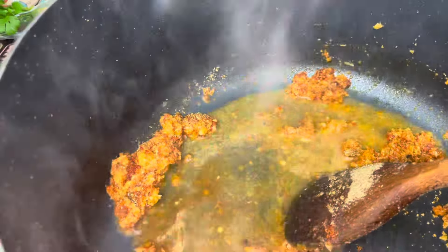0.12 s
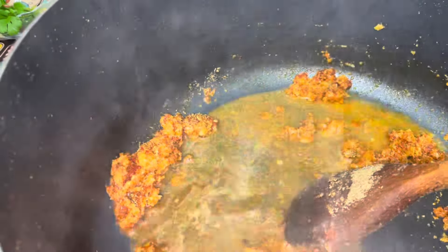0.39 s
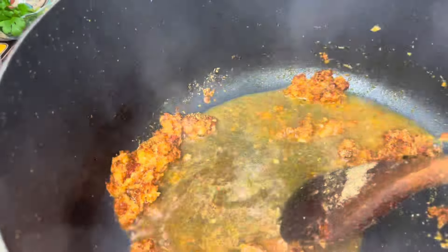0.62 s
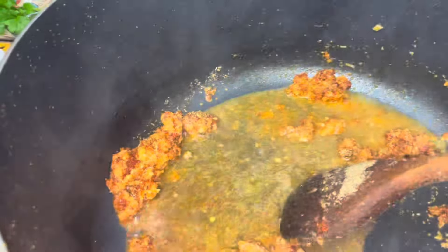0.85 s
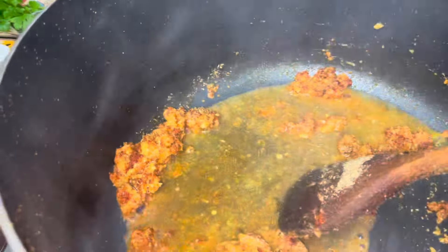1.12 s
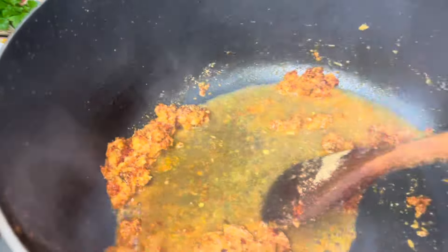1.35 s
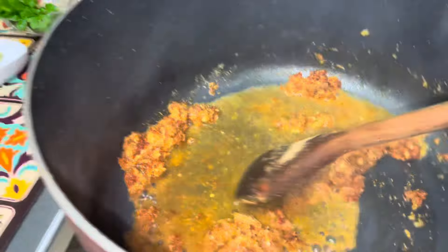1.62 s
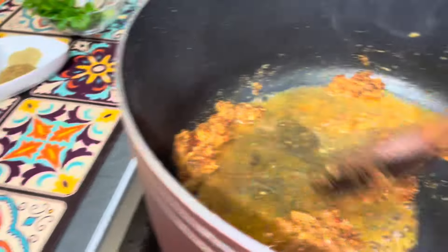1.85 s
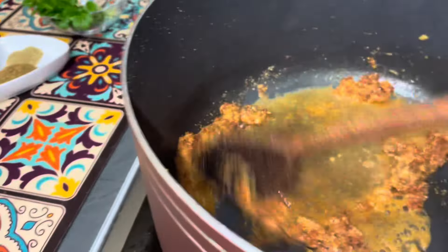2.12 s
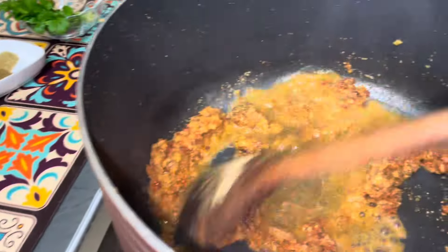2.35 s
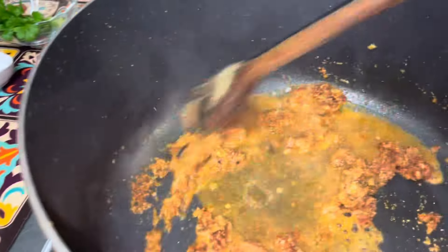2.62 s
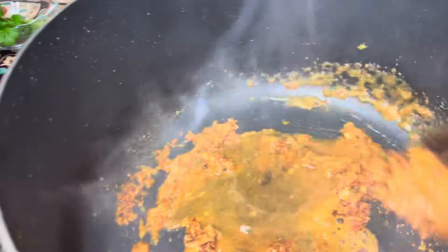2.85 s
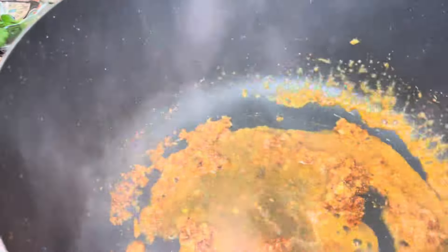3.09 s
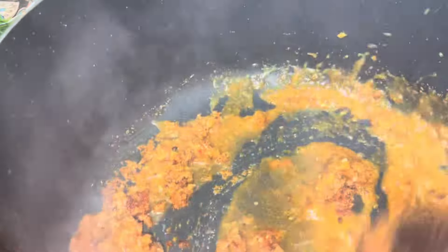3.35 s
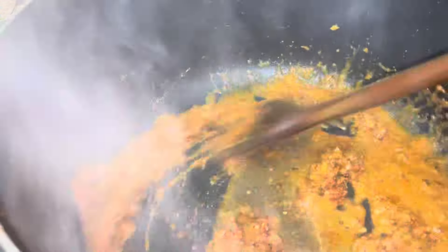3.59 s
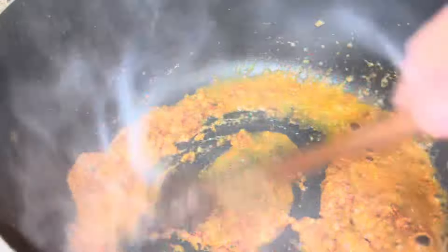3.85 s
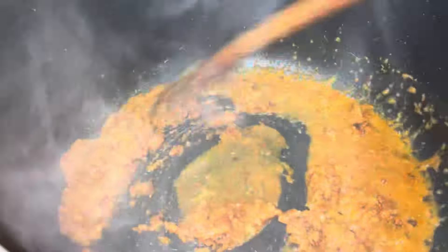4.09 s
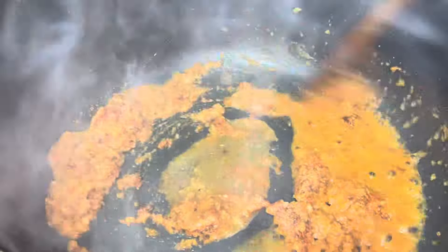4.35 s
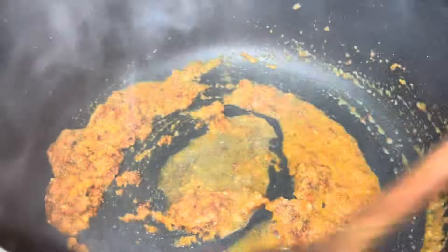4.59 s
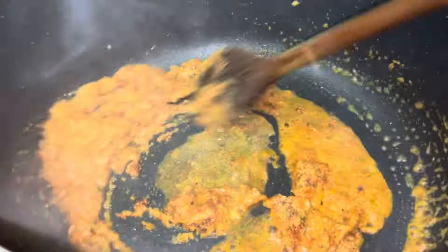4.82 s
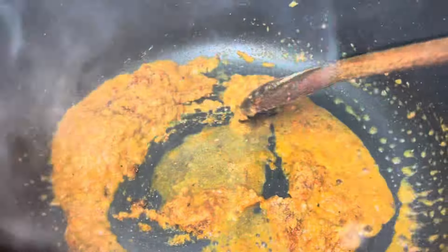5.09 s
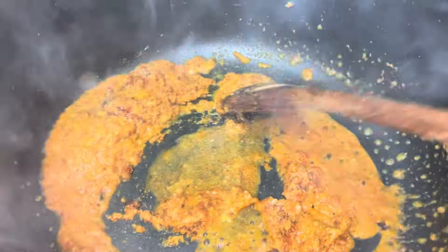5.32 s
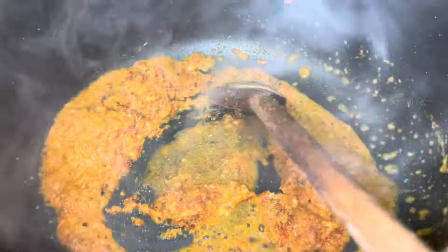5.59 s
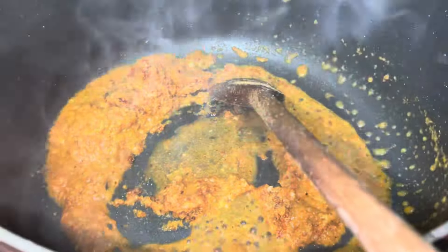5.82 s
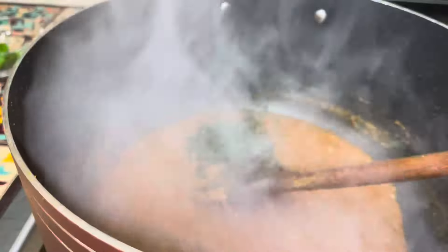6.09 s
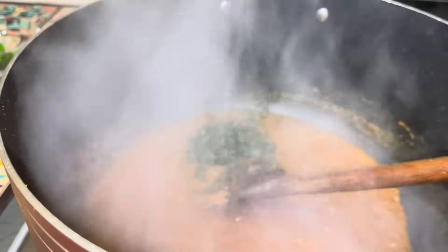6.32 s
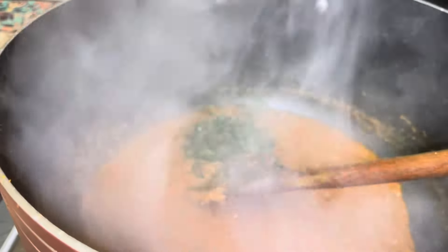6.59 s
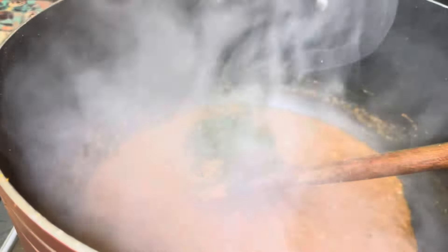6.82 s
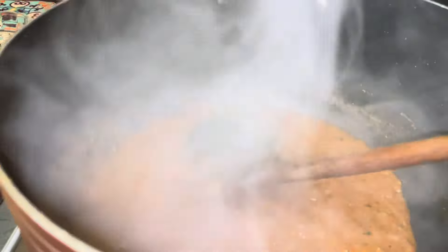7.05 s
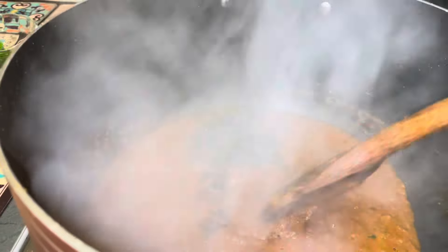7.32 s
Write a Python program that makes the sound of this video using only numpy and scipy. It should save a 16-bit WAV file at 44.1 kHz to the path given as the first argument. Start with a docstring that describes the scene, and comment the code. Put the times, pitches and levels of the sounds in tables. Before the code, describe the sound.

Close stereo sound over a wide metal pot, in a lightly echoing home kitchen with a low unsteady rumble. From 0 seconds, wet paste fries in hot oil with a dense, bright, crackling hiss, gradually easing. Four loud but dull clatters, things set down on a worktop further off, fall at about 0.7, 0.9, 1.0 and 1.1. Around 1.5 to 1.7 a wooden spoon sticks and slips in three tiny low groans. Sizzle swells from 1.75, jumps at 2.5 and peaks near 3.0, with hollow knocks at 1.9 and 2.4 and juddering scrapes. A quick triple knock comes at 3.3, a softer double at 4.2. Sizzle fades, then flares again around 4.6 to 4.8; two strong, rounded knocks land at 4.9 and 5.0, followed by a rub. At 6.0 it cuts abruptly to quiet simmering: thin fizz, slow low bubbles, and a very faint knock at 7.0.

```python
"""Wet paste frying in hot oil

Clicks and hiss of bursting steam, filtered by a wide metal pot, sizzle close to a phone's two microphone ports.
A wooden spoon knocks (swelling sines), scrapes (bursts through pot resonances) and groans (gliding tones).
Four dull clatters, noise through a worktop's resonances, sound further off over a low kitchen rumble.
Near the end the scene jumps to a later, quietly simmering sauce: thin fizz over slow bubbles."""
import sys
import numpy as np
from scipy import signal
from scipy.fft import rfft, irfft, next_fast_len
from scipy.io import wavfile
from scipy.ndimage import uniform_filter1d, map_coordinates

SR = 44100
rng = np.random.default_rng(int(sys.argv[2]) if len(sys.argv) > 2 else 0)


def materialize(psi):
    """Save the field psi as 16-bit PCM at rate SR to the path in sys.argv[1].

    A 1-D psi becomes a single channel; in a 2-D psi each row is a channel.
    """
    bounded = np.clip(np.atleast_2d(psi).T, -1, 1)
    quanta = np.round(bounded * 32767).astype(np.int16)
    wavfile.write(sys.argv[1], SR, quanta)


def undo_db(level):
    """Turn decibels back into plain size, where 20 dB means ten times bigger."""
    steps = np.asarray(level, float) / 20
    return 10 ** steps


N = 328059
TIME = np.arange(N) / SR  # s
HZ = np.fft.rfftfreq(next_fast_len(N + SR // 2), 1 / SR)
JUMP_S = 6.021  # from frying to simmering

# Shapes of the sizzle and of its fine treble spit, relative spectral density: [f/Hz, level/dB]
SIZZLE_SPECTRUM = [(500, -72), (1200, -10.5), (2200, 0), (3200, 0.5), (4500, 1.5), (6000, 1.5), (7200, 3),
                   (8300, 2), (9500, -3.5), (11000, -20), (13000, -46)]
SPIT_SPECTRUM = [(6000, -36.5), (8300, -11.5), (9500, -4.5), (10500, 0), (11500, 0), (13000, 1.5),
                 (14200, -6), (15750, 5.5)]
# Air and wall resonances of the pot: [f/Hz, width/Hz, relative level/dB]
POT_RESONANCES = [(435, 32, 2.5), (994, 134, 3), (1478, 31, -8.5), (1850, 33, -23), (1980, 47, -8),
                  (2373, 20, -10), (2990, 62, -8.5), (3370, 110, -9.5), (4550, 140, -12)]
# The spoon turns wet paste onto bare hot metal:
# [t/s, rise/s, sizzle level/dB, spit level over that sizzle/dB]
FLARES = [(1.75, 0.52, -30.5, -3.5), (2.47, 0.056, -27.5, -3), (2.72, 0.28, -21, -6),
          (3.1, 0.07, -31, -4.5), (4.0, 0.32, -32, -4), (4.58, 0.08, -26.5, -4), (4.68, 0.13, -28, -3.5)]
# Brief bursts of treble, the first together with the first clatter: [t/s of the middle, level/dB]
TREBLE_BURSTS = [(.68, -29.5), (2.21, -33), (2.58, -26), (4.88, -31), (5.7, -35.5)]

# The spoon's edge drags over the pot floor: [t/s, length/s, pot tone level/dB, stove shudder level/dB]
RUBS = [(1.517, 0.16, -39, -66), (1.92, 0.069, -47, -51), (2.357, 0.16, -50, -48), (2.923, 0.085, -34, -45),
        (3.05, 0.26, -47, -48), (3.264, 0.1, -32.5, -42), (3.506, 0.19, -40, -55), (4.215, .08, -37, -58),
        (5.008, 0.089, -34, -39.5), (5.203, 0.24, -38.5, -48)]
# The spoon sticks and slips: [start t/s, end t/s, first f/Hz, last f/Hz, level/dB]
GROANS = [(1.531, 1.588, 390, 429, -23), (1.606, 1.671, 400, 429, -22), (1.672, 1.69, 400, 430, -23)]
# Spoon blows: [t/s, level/dB, pot note f/Hz, thump level re blow/dB, tap level re blow/dB]
KNOCKS = [(1.923, -20, 390, -12, -14), (2.398, -24, 376, -4, -1), (2.489, -31, 363, -11, -7),
          (3.262, -18.5, 426, -2.5, 0), (3.284, -19.5, 396, -10, 0), (3.311, -19, 404.6, -13, -3),
          (4.228, -25.5, 401, -13, 3), (4.244, -24, 390, -16, -4), (4.89, -12, 416, -30, -12.5),
          (5.002, -13, 360, -13, -8), (6.985, -38.5, 410, -2.5, -29)]

# Things set down: [t/s, level/dB, thud level re blow/dB, main ring f/Hz, second ring f/Hz]
CLATTERS = [(0.674, -10, -9, 1060, 3940), (0.863, -4, -13, 1154, 2500), (1.021, -8, -25, 1770, 960),
            (1.106, -9, -8, 3370, 1600)]
# Resonances of the worktop: [f/Hz, width/Hz, relative level/dB]
WORKTOP_RESONANCES = [(490, 49, 8), (716, 32, 5.5), (947, 29, 0), (1110, 19, 0), (1303, 52, -3),
                      (1442, 56, 2), (1590, 63, -3), (1764, 22, 8), (2003, 61, 3), (2670, 80, 5),
                      (2970, 98, -7), (3290, 59, 2.5), (3980, 40, 2), (4780, 110, 5.5), (5100, 94, 4)]

# Shapes of the simmer's fizz and bubbles and of the rumble, relative spectral density: [f/Hz, level/dB]
FIZZ_SPECTRUM = [(800, -0.5), (1500, -3), (2500, -3), (4000, -3), (6000, -3), (8300, -4), (10500, -9),
                 (13000, -17), (15800, -22)]
BUBBLING_SPECTRUM = [(88, -45), (150, -13), (162, -20.5), (236, -4), (371, -5.5), (405, 2), (468, -7),
                     (510, -8), (655, -14.5), (875, -7), (1240, -21), (1400, -10.5), (1500, -35),
                     (1950, -60), (3300, -120)]
RUMBLE_SPECTRUM = [(18, -48), (30, -9), (54, 0), (113, -4), (162, -12.5), (250, -3), (320, -15.5),
                   (550, -120)]

# Reverberation time of the kitchen: [f/Hz, t60/s]
ROOM_T60 = [(100, 0.81), (1000, 0.16), (8000, 0.35)]
# Phase of the right channel ahead of the left, in steps through the treble: [f/Hz, phase/half turns]
RIGHT_AHEAD = [(300, 0), (2800, -.16), (5000, -.08), (7000, .3), (7600, .8), (7650, 1), (8850, 1),
               (9000, 1.3), (9600, 1.55), (9800, 1.8), (10300, 2), (12600, 2), (13600, 2.3), (13800, 3),
               (16000, 3)]
# Level of the left channel over the right: [f/Hz, level/dB]
LEFT_OVER_RIGHT = [(200, .6), (600, 0), (1200, 1.8), (2700, 6), (4200, 5), (6300, 2.6), (7600, 0)]
# Likeness of the two channels, 1 = identical apart from level and phase: [f/Hz, likeness]
LIKENESS = [(30, .99), (400, .95), (700, .78), (1200, .72), (1800, .4), (2700, .6), (4200, .8), (6200, .85),
            (7300, .5), (7650, 1), (8850, 1), (9500, .7), (10300, 1), (12600, 1), (13600, .4), (13850, 1)]


def unit(x):
    """Normalisation: the signal scaled to rms 1."""
    return x / np.sqrt(np.mean(x ** 2) + 1e-20)


def along(points, hz=HZ):
    """Linear interpolation of (f/Hz, value) points over a logarithmic frequency axis."""
    f, value = np.transpose(points)
    return np.interp(np.log(hz + 1), np.log(f + 1), value)


def colour(points):
    """Spectral shaping: the gain of a spectrum that falls silent outside its ends."""
    return undo_db(along(points)) * (HZ > points[0][0]) * (HZ < points[-1][0])


def filtered(x, response):
    """Linear filtering: the spectrum times a complex response on the HZ grid."""
    length = 2 * len(HZ) - 2
    return irfft(rfft(x, length) * response, length)[..., :N]


def resonance(hz, width):
    """Damped oscillator: a causal resonance of peak gain 1, width in Hz."""
    return 1j * HZ * width / (hz * hz - HZ * HZ + 1j * HZ * width)


def resonances(table):
    """Modal superposition: a body's resonances, neighbours in the table in opposite phase."""
    return sum((-1) ** k * undo_db(db) * resonance(hz, width) for k, (hz, width, db) in enumerate(table))


def wobble(rate):
    """Random modulation: a smooth curve through random knots, rate of them a second."""
    return map_coordinates(rng.standard_normal(int(N * rate / SR) + 4), [TIME * rate])


def swell(t, tau):
    """Soft contact: an envelope that grows, peaks at 1 when t = 2 tau, and dies."""
    return (t / tau / 2) ** 2 * np.exp(2 - t / tau)


def struck(t, t60, rise):
    """Struck body: exponential decay (t60 in s) after an exponential rise (time constant in s)."""
    return undo_db(-60 * t / t60) * (1 - np.exp(-t / rise))


def bursts(per_s, spread_db, hiss, patchy_db, count):
    """Random bubble collapse: two streams of uneven clicks on hiss, gains in patches count frames long."""
    sizes = undo_db(spread_db * rng.standard_normal((2, N)))
    clicks = (rng.random((2, N)) < per_s / SR) * sizes * rng.choice([-1, 1], (2, N))
    z = signal.stft(unit(clicks) + hiss * rng.standard_normal((2, N)), nperseg=256)[2]
    patches = uniform_filter1d(rng.standard_normal(z.shape[1:]), size=5, axis=0)
    patches = uniform_filter1d(patches, size=count, axis=1)
    return signal.istft(z * undo_db(patchy_db * unit(patches)), nperseg=256)[1][:, :N]


def two_channels(pair, response):
    """Partial coherence: a shared and an opposed stream set the likeness, then level and phase are tilted."""
    turn = np.arccos(np.clip(along(LIKENESS), -1, 1)) / 2
    shared, opposed = filtered(pair, response * [np.cos(turn), np.sin(turn)])
    # half the level and half the phase difference go to each channel
    half = undo_db(along(LEFT_OVER_RIGHT) / 2) * np.exp(-.5j * np.pi * along(RIGHT_AHEAD))
    return unit(filtered(np.array([shared + opposed, shared - opposed]), np.array([half, 1 / half])))


def vigour():
    """Power addition: levels in dB of sizzle and spit, the drying first water plus flares and treble bursts."""
    first_db, drying_db_per_s = -25.5, 2  # the water poured earlier boils away
    first_spit_db, spit_drying_db_per_s = -2.06, 3  # spit level over the first sizzle
    flare_fade_db_per_s = 6.5  # alike for sizzle and spit
    burst_s = 0.047  # half length, to 1/e of the power
    sizzle = undo_db(first_db - drying_db_per_s * TIME) ** 2
    spit = undo_db(first_db + first_spit_db - spit_drying_db_per_s * TIME) ** 2
    for middle, db in TREBLE_BURSTS:
        spit = spit + undo_db(db) ** 2 * np.exp(-((TIME - middle) / burst_s) ** 2)
    for start, rise, db, spit_db in FLARES:
        grown = np.clip((TIME - start) / rise, 0, 1) ** 2
        fade_db = flare_fade_db_per_s * np.maximum(TIME - start - rise, 0)
        sizzle = sizzle + grown * undo_db(db - fade_db) ** 2
        spit = spit + grown * undo_db(db + spit_db - fade_db) ** 2
    return 10 * np.log10(sizzle), 10 * np.log10(spit)


def frying():
    """Flash boiling: water bursts to steam in the oil; the pot colours the low part of the sizzle."""
    sizzle_db, spit_db = vigour()
    steam = bursts(6000, spread_db=4.0, hiss=1.84, patchy_db=0.95, count=14)
    steam = steam * undo_db(0.19 * wobble(16) + 0.82 * wobble(35))
    pot = resonances(POT_RESONANCES)
    sizzle = undo_db(sizzle_db) * two_channels(steam, colour(SIZZLE_SPECTRUM) * (1 + 0.58 * np.abs(pot)))
    spit = undo_db(spit_db) * two_channels(steam, colour(SPIT_SPECTRUM))
    # the pot's drone: -39.5 dB at a sizzle of -26 dB, following 0.83 of its swings
    drone_db = -39.5 + 0.83 * (sizzle_db + 26)
    drone = undo_db(drone_db) * two_channels(steam, pot * resonance(1170, 1670))
    return sizzle + spit + drone


def simmering():
    """Bubble oscillation: thin fizz over slow bubbles that swell and collapse in the sauce."""
    fizz = bursts(3000, spread_db=4.5, hiss=0.68, patchy_db=2.0, count=4)
    fizz = two_channels(fizz, colour(FIZZ_SPECTRUM))
    bubbles = bursts(300, spread_db=1.0, hiss=1.4, patchy_db=1.0, count=10)
    bubbles = two_channels(bubbles, colour(BUBBLING_SPECTRUM))
    return undo_db(-41) * fizz + undo_db(-43.5 + 0.78 * wobble(23)) * bubbles


def scraping():
    """Friction drive: the spoon's edge judders on the pot floor, excites its low modes and shakes the stove."""
    attack_s, tone_t60_s, shudder_t60_s = 0.061, 0.23, 0.65
    # what the boiling alone drives, under the sizzle
    boiling = undo_db(vigour()[0])
    pressed, shaken = undo_db(-18.5) * boiling, undo_db(-33) * boiling
    for start, length, tone_db, shudder_db in RUBS:
        grip = np.clip((TIME - start) / attack_s, 0, 1)
        after = np.maximum(TIME - start - length, 0)
        pressed = np.hypot(pressed, grip * undo_db(tone_db - 60 * after / tone_t60_s))
        shaken = np.hypot(shaken, grip * undo_db(shudder_db - 60 * after / shudder_t60_s))
    judder = bursts(400, spread_db=5.5, hiss=1.0, patchy_db=0.8, count=10)
    body = resonance(406, 41) + undo_db(-2.5) * resonance(349.5, 68) + undo_db(-17.5) * resonance(433, 39)
    tone = two_channels(judder, body * resonance(391, 305) ** 2)
    shudder = two_channels(judder, (resonance(228, 69) + resonance(83, 50)) * resonance(117, 200))
    return pressed * tone + shaken * shudder


def knocking():
    """Soft impact: the pot note swells during the spoon's contact, with a stove thump and a short tap."""
    out, t = np.zeros(N), TIME[:SR // 3]
    contact_s = 0.0039  # the note peaks at twice this
    stove = resonance(99, 47) + undo_db(-7.5) * resonance(231, 84)
    stove = unit(filtered(rng.standard_normal(N), stove))
    wood = unit(filtered(rng.standard_normal(N), resonance(640, 1400) ** 2))
    for s, db, hz, thump_db, tap_db in KNOCKS:
        start = round(s * SR)
        span = slice(start, start + len(t))
        tones = 1.29 * np.sin(2 * np.pi * hz * t) + 0.35 * np.sin(2 * np.pi * 0.785 * hz * t)
        note = swell(t, contact_s) * tones
        thump = undo_db(thump_db) * struck(t, 0.3, 0.0042) * stove[span]
        tap = np.sin(2 * np.pi * 930 * t) + .5 * wood[span]
        tap = undo_db(tap_db) * struck(t, 0.03, 0.00024) * tap
        out[span] += undo_db(db) * (note + thump + tap)
    return out


def groans():
    """Stick-slip: slips lock onto the pot note, grow, and stop when the spoon comes free."""
    out = np.zeros(N)
    for start, end, first_hz, last_hz, db in GROANS:
        progress = np.clip((TIME - start) / (end - start), 0, 1)
        hz = first_hz + (last_hz - first_hz) * progress + 25 * wobble(120)
        cycles = np.cumsum(hz) / SR
        release = np.maximum(TIME - end + 0.0058, 0)  # s, lets go just before the end
        grip = progress ** 1.7 * undo_db(-60 * release / 0.024)
        out += undo_db(db + 1.5 * wobble(89.7)) * grip * np.sin(2 * np.pi * cycles)
    return out


def clatter():
    """Impact on a plate: each thing drives its part of the worktop's rings, with crack, thud and late boom."""
    out, rings = np.zeros((2, N)), resonances(WORKTOP_RESONANCES) + 0.4
    dull = 1 / (1 + 1j * HZ / 7500) ** 4  # distance takes the treble
    for s, db, thud_db, main_hz, second_hz in CLATTERS:
        t = np.maximum(TIME - s, 0)
        shared = rng.standard_normal(N)
        low = shared + 0.33 * rng.standard_normal((2, N))
        # a sharp first contact, then the kitchen's echo
        decay = undo_db(-60 * t / 0.061) + 0.77 * undo_db(-60 * t / 0.43)
        force = decay * (TIME > s) * (shared + 4.0 * rng.standard_normal((2, N)))
        # a weaker blow has relatively more of the second ring
        second = undo_db(-13 - db) * resonance(second_hz, 0.83 * second_hz)
        thing = resonance(main_hz, 0.58 * main_hz) ** 2 + second + 0.11
        rattle = filtered(force, thing * rings * dull)
        crack = filtered(struck(t, 0.037, 0.0019) * low, (thing - .1) * dull)
        out += undo_db(db) * (rattle / np.abs(rattle).max() + undo_db(-5.5) * crack / np.abs(crack).max())
        # the worktop's panel note and low noise, a little louder on the right
        note = swell(t, .008) * np.sin(2 * np.pi * 244 * t)
        thud = unit(filtered(low, resonance(240, 30) * resonance(270, 440)))
        thud = undo_db(-4.5) * struck(t, 0.36, 0.015) * thud
        out += undo_db(db + thud_db) * (note + thud) * undo_db([[-.9], [.9]])
        # equally strong for every blow
        boom = unit(filtered(low, resonance(74, 50) + resonance(136, 60)))
        out += undo_db(-21.5) * struck(t, 0.44, 0.021) * boom
    return out


def room(x):
    """Reverberation: each frequency of the kitchen's answer dies at its own speed."""
    hz, t, z = signal.stft(rng.standard_normal((2, SR // 2)), SR, nperseg=256)
    decay = undo_db(-60 * t / along(ROOM_T60, hz)[:, None])
    tail = signal.istft(z * decay, SR, nperseg=256)[1]
    tail = tail / np.linalg.norm(tail[0])
    delayed = np.pad(x, (500, 0))[None]  # samples
    return signal.fftconvolve(delayed, tail, axes=1)[:, :N]


def kitchen():
    """Broadband background noise: low rumble of burner and house, of unsteady level."""
    rumble = two_channels(rng.standard_normal((2, N)), colour(RUMBLE_SPECTRUM))
    return undo_db(-52 + 3.8 * wobble(4.27)) * rumble


def scene():
    """Superposition: frying until the jump, simmering after it, with spoon, clatters and rumble added."""
    later = np.clip((TIME - JUMP_S) / 0.008 + .5, 0, 1)
    cooking = (1 - later) * (frying() + scraping()) + later * simmering()
    spoon = knocking() + groans()
    direct = spoon * undo_db([[.5], [-.5]])  # a little louder on the left
    return cooking + direct + undo_db(-14.5) * room(spoon) + clatter() + kitchen()


def roll_off(x):
    """The treble ends steeply here."""
    return signal.sosfilt(signal.butter(12, 15800, fs=SR, output="sos"), x)


def record(dry):
    """High-pass filtering: the phone's microphone cuts the deep bass, three first-order stages at 45 Hz."""
    bass_cut = (1j * HZ / 45 / (1 + 1j * HZ / 45)) ** 3
    return roll_off(filtered(dry, bass_cut))


dry = scene()
out = record(dry)
materialize(out)
```